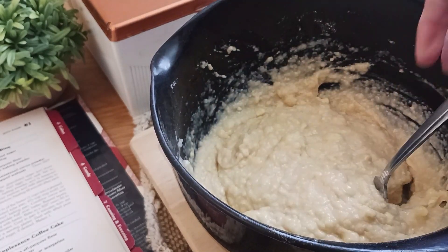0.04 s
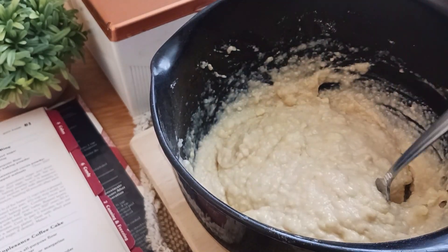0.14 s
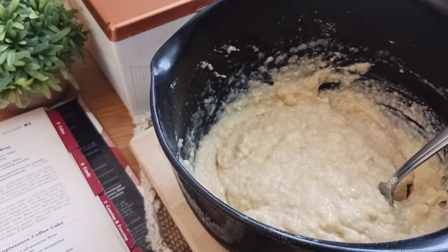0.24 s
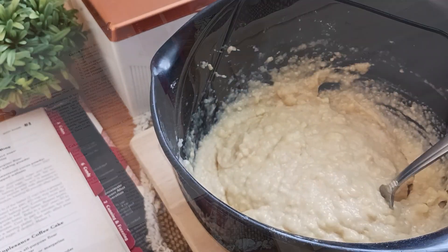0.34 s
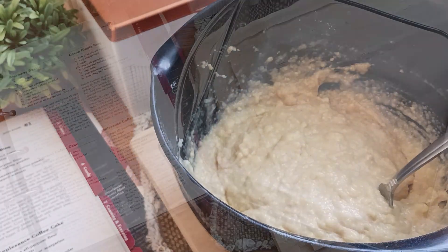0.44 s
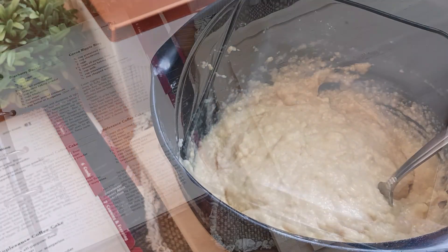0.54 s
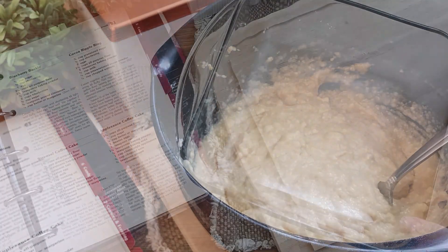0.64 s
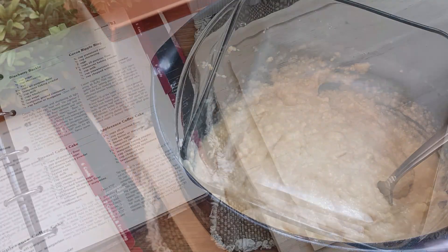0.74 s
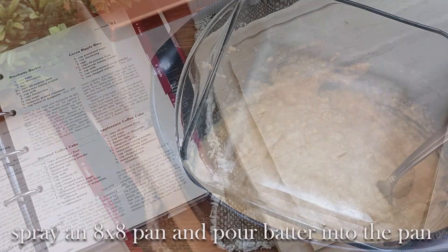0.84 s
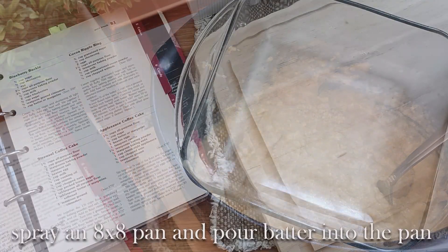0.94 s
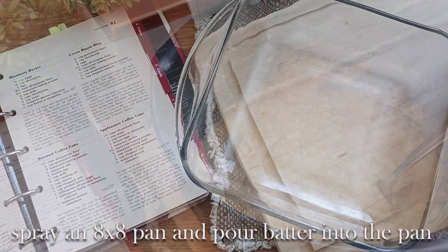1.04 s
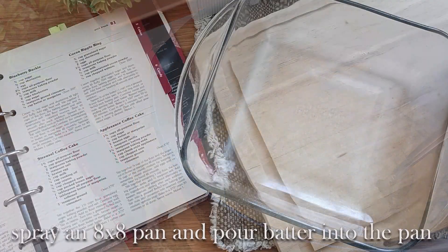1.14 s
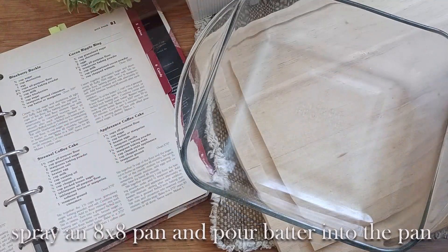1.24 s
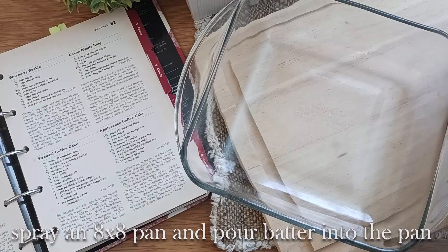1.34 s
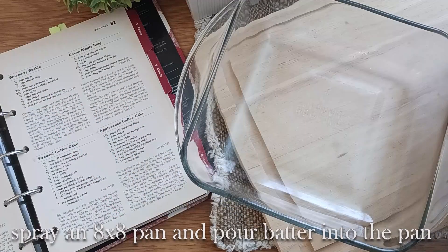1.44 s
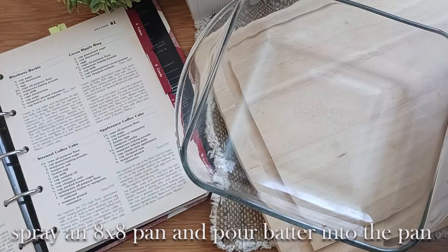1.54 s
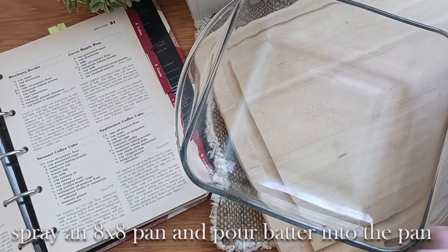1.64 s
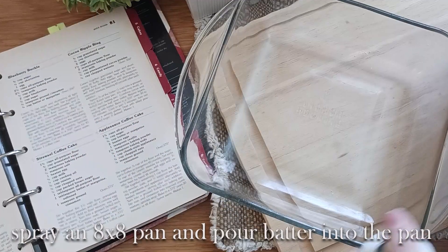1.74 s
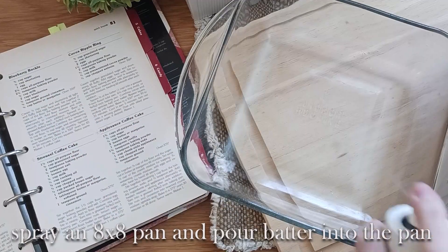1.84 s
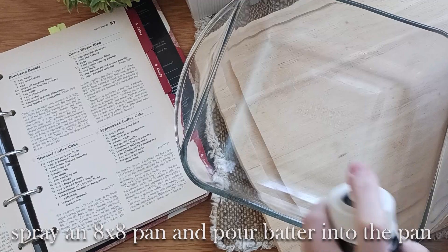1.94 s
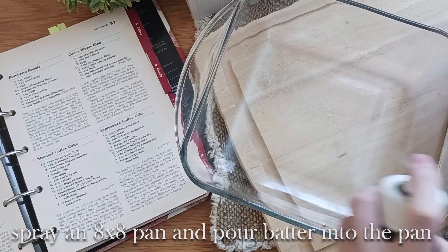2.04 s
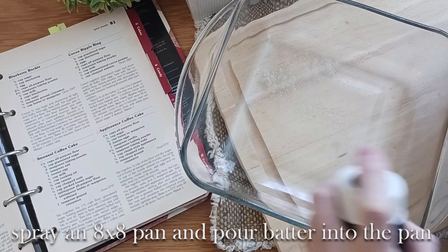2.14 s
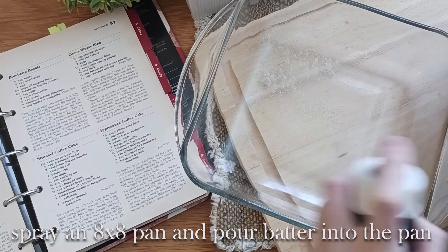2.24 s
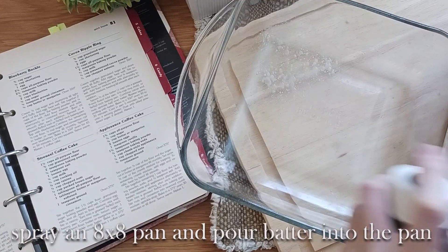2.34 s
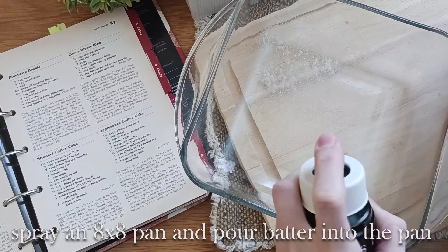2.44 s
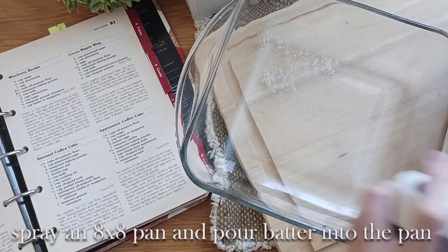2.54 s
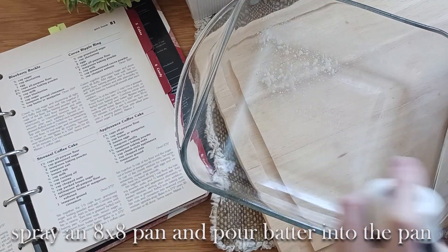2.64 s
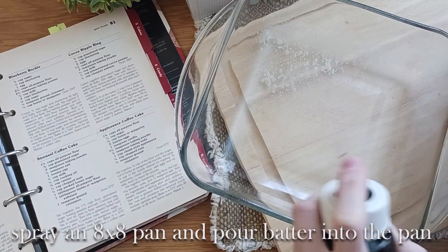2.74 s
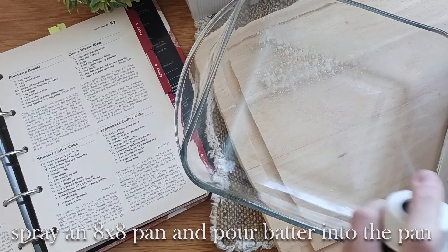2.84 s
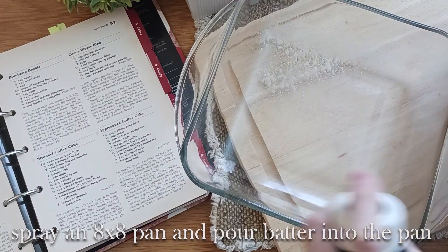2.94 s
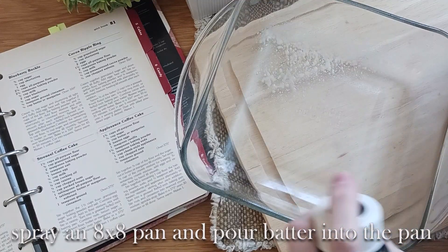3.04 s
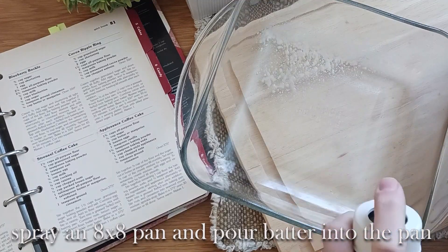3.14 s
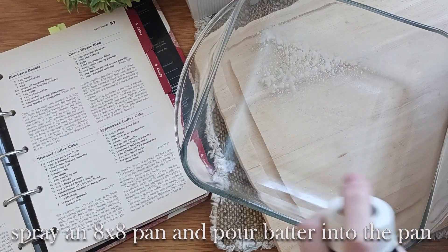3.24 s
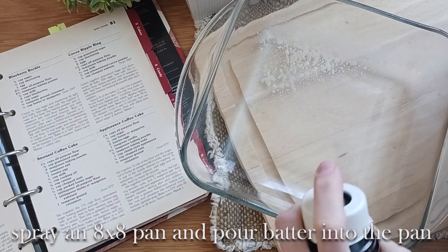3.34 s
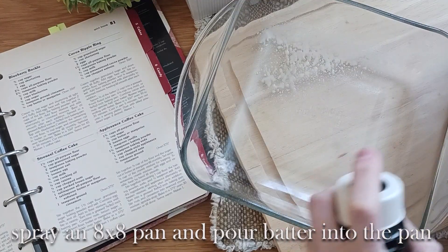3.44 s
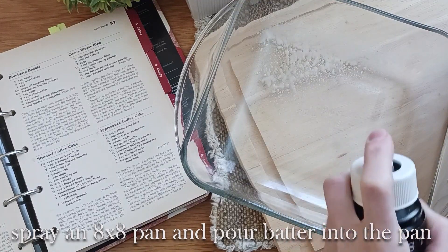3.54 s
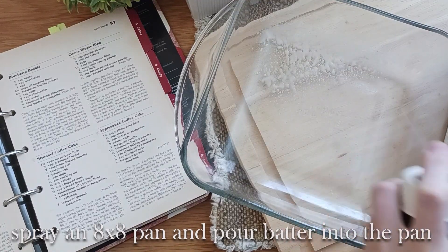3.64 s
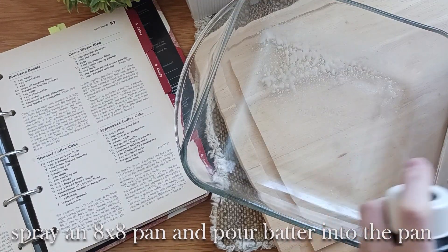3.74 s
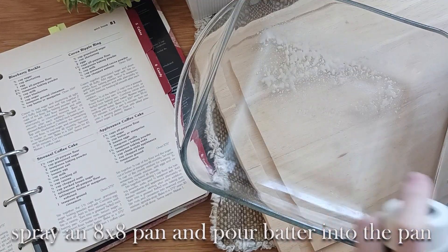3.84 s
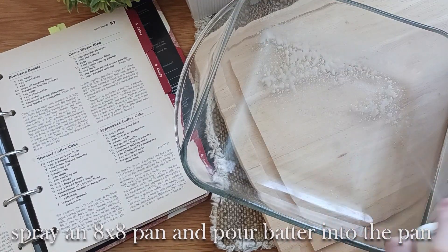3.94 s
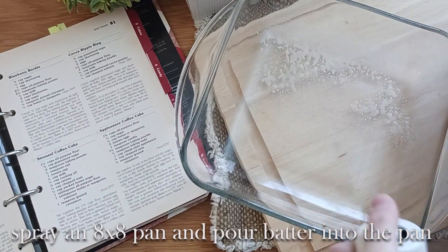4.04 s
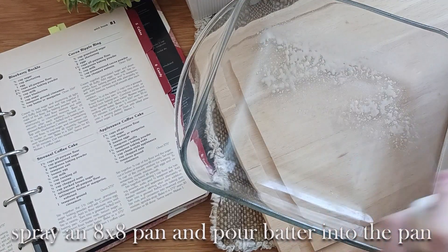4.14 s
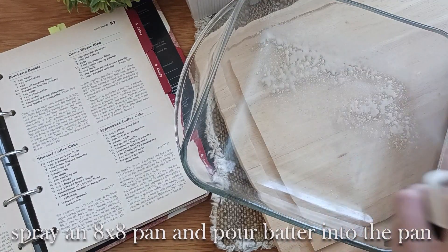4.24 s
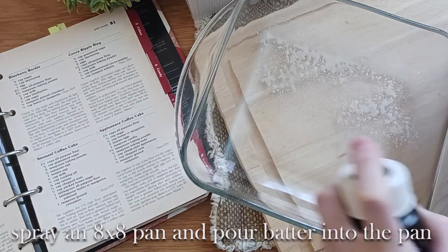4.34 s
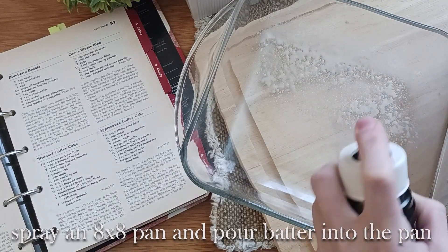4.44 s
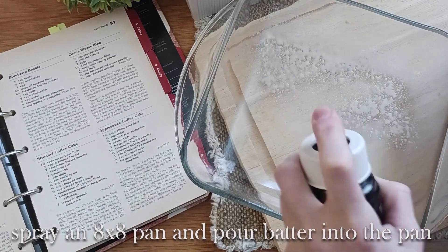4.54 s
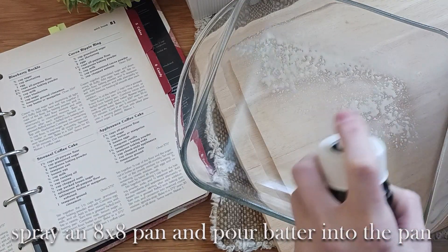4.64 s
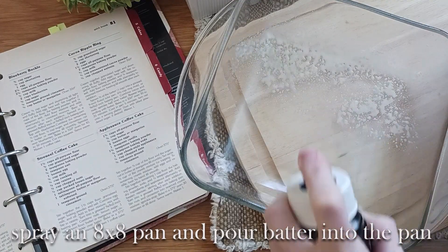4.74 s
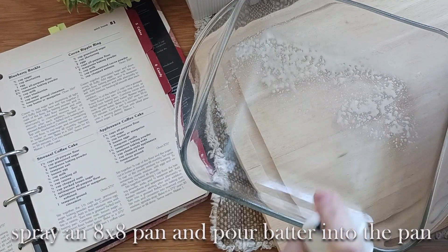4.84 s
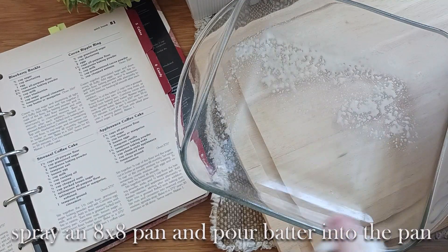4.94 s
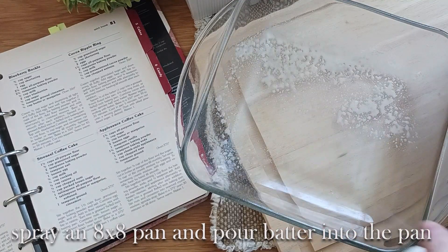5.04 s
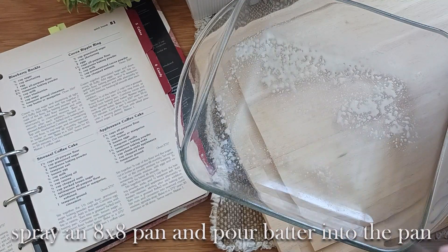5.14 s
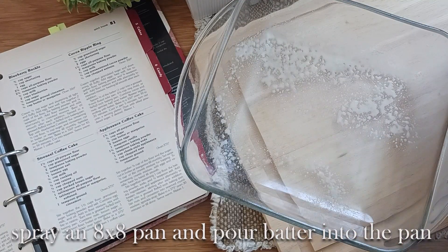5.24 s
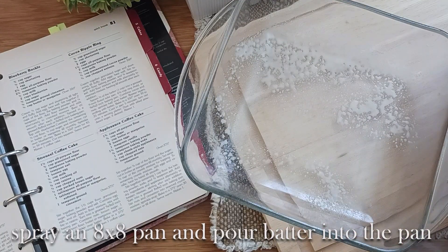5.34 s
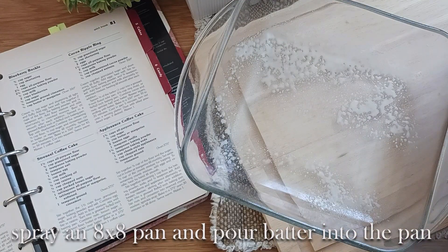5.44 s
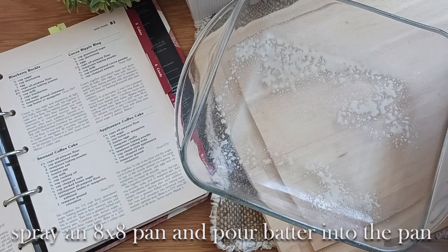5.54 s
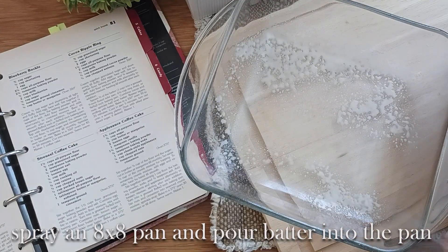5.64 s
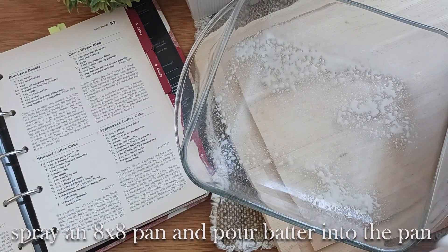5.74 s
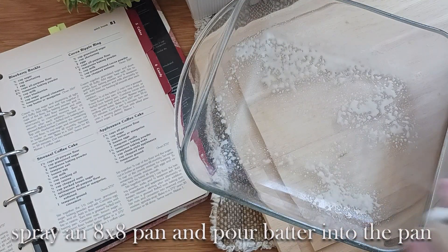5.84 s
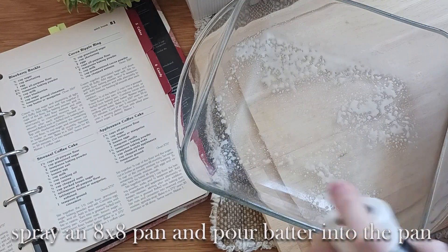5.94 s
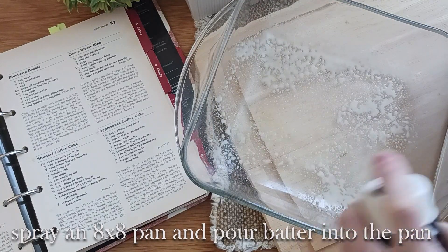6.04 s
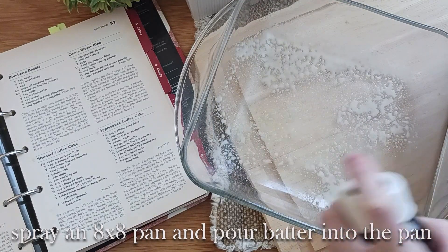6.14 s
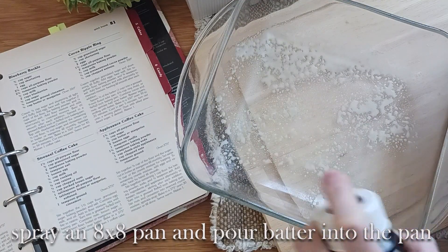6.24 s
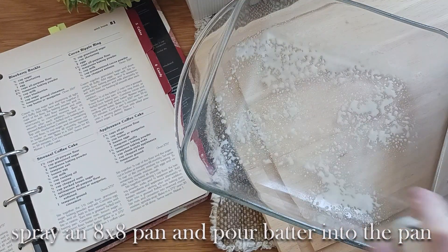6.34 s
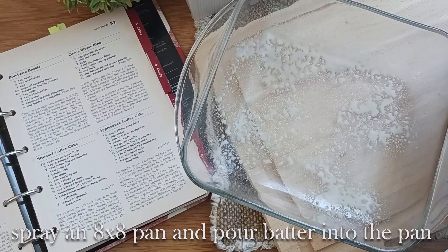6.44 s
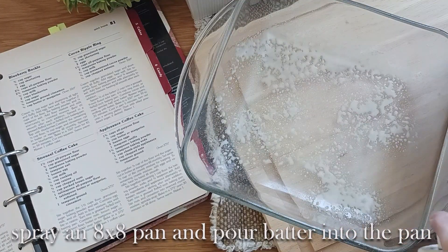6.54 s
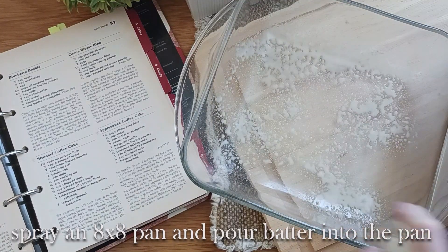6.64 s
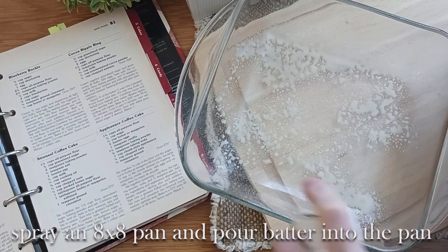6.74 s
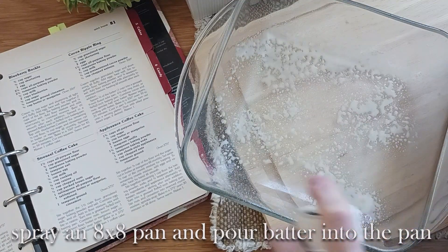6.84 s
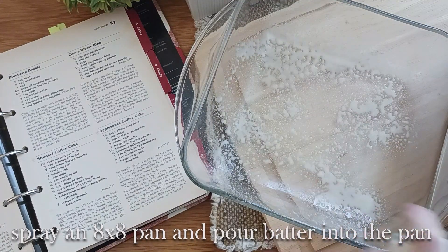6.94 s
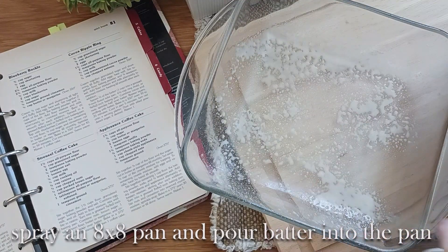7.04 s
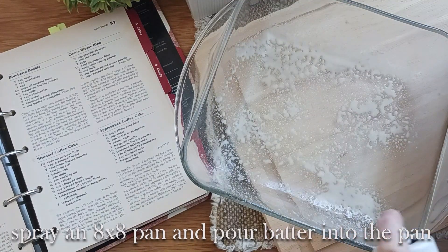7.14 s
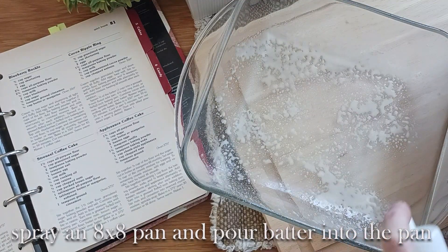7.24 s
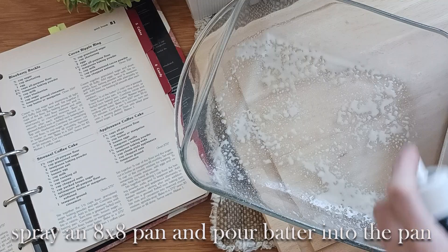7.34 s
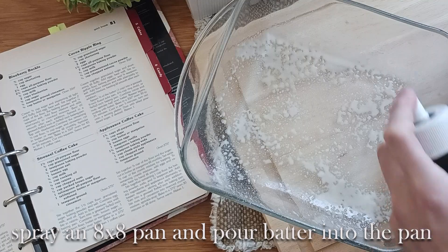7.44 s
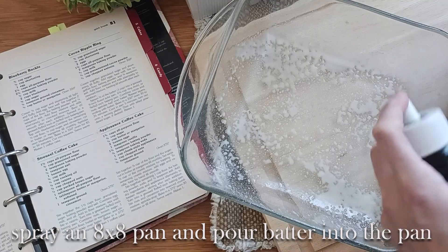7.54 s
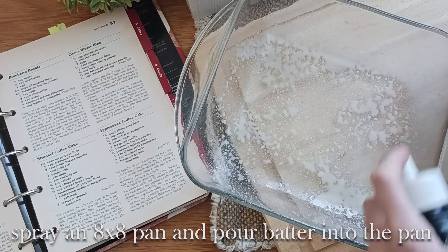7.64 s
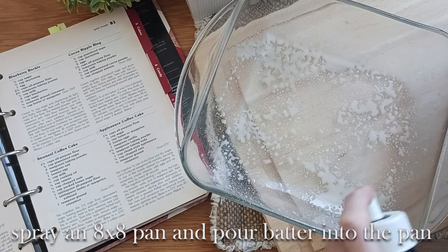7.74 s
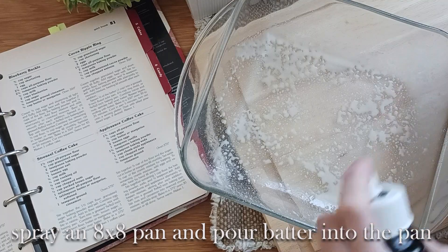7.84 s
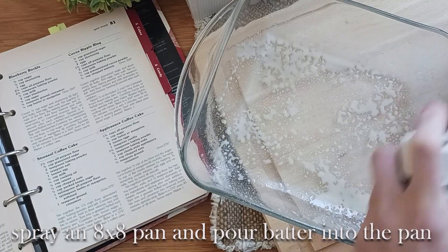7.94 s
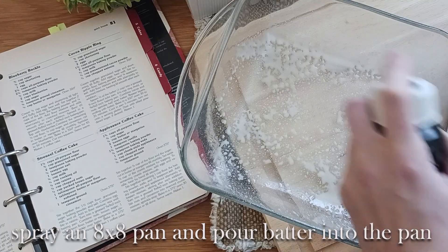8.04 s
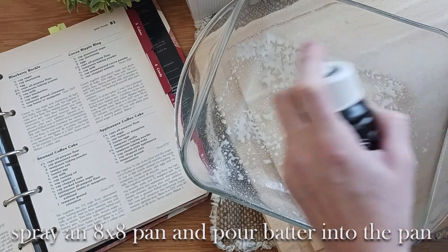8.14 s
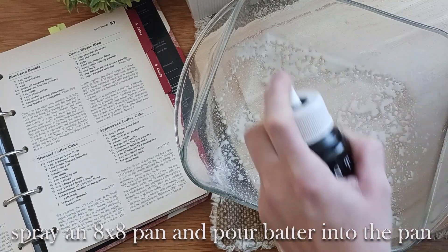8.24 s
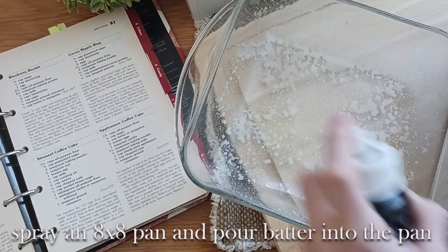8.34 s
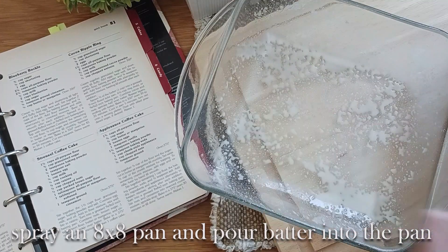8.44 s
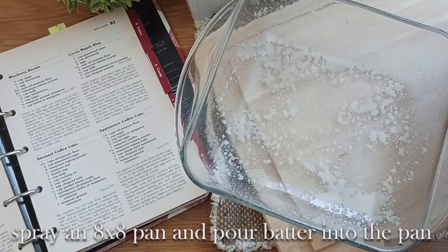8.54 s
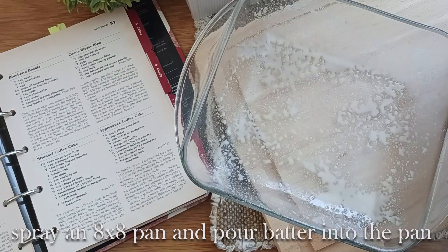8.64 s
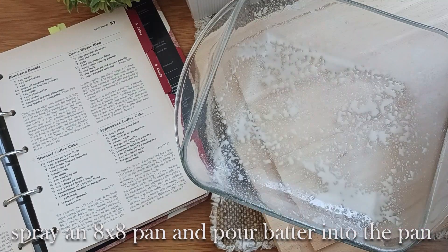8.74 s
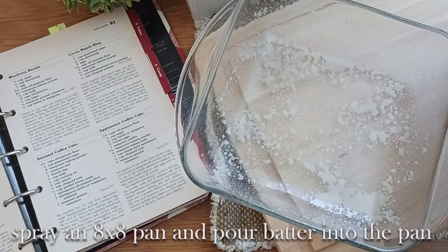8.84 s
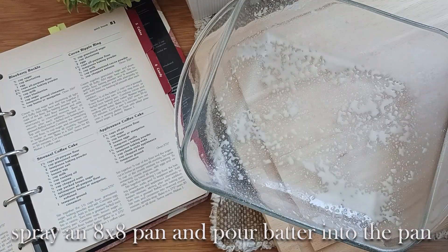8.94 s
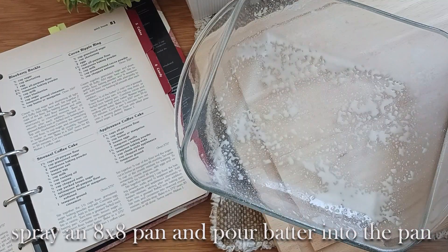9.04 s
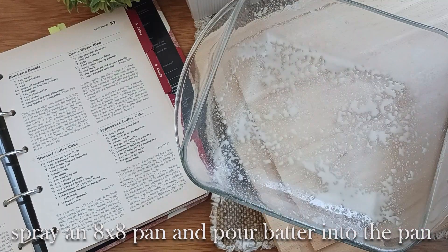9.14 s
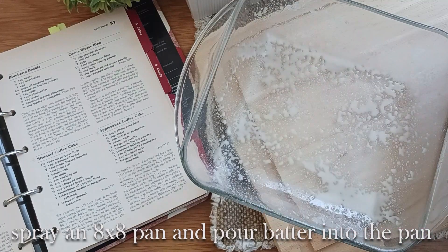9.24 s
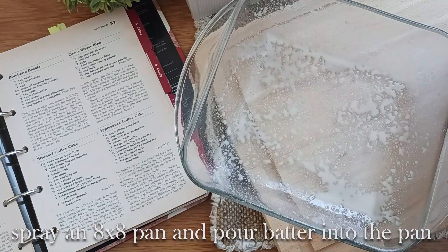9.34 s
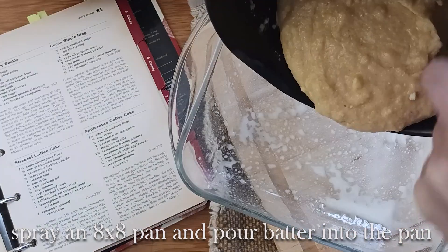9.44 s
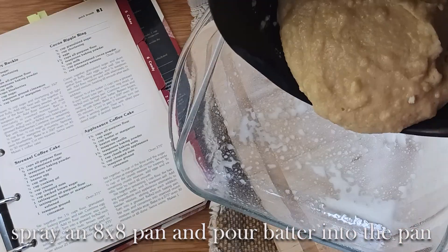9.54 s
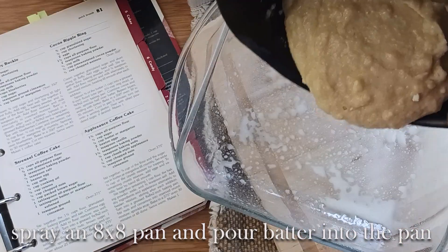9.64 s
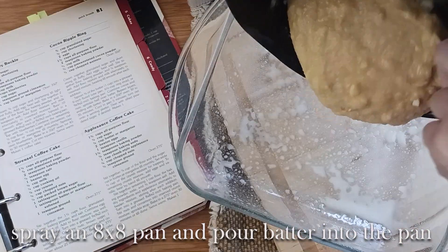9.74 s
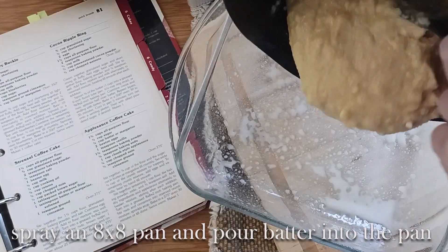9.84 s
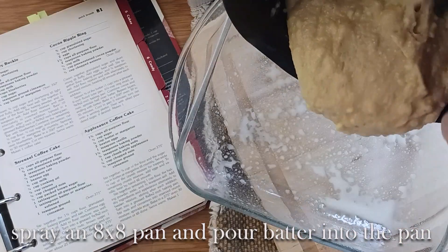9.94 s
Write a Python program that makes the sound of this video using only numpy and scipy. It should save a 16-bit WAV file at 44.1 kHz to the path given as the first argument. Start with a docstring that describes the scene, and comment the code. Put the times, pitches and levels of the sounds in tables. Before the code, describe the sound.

A sharp pop of a can's cap is followed by the close, high hiss of aerosol oil hitting a glass baking dish: one squirt, a long one, then three short ones with nozzle clicks. Quiet plastic taps follow on the left as the can is set down, then a faint sticky rustle of batter leaving a bowl. The small kitchen has a short echo, a soft appliance hum and very faint birdsong from outside.

```python
"""Aerosol oil, five squirts onto a glass baking dish, close to a two-port microphone in a small kitchen.
Gas fizzes in the nozzle and droplets hiss lower on the glass. First the can's cap pops off; afterwards
can and cap tap down on the counter to the left, and batter tips from a bowl with a rustle and ticks.
An appliance hums through the room's low resonances, and a bird whistles faintly outside."""
import sys
import numpy as np
from scipy import signal
from scipy.fft import rfft, irfft
from scipy.io import wavfile
from scipy.ndimage import uniform_filter1d

SR = 44100
rng = np.random.default_rng(int(sys.argv[2]) if len(sys.argv) > 2 else 0)


def waveform_to_disk(signal):
    """Save audio, clipped to [-1, 1], as 16-bit WAV at the path in sys.argv[1]."""
    frames = np.transpose(np.atleast_2d(signal))
    scaled = np.clip(frames, -1, 1) * 32767
    samples = np.round(scaled).astype(np.int16)
    wavfile.write(sys.argv[1], SR, samples)


N = 440548

# low room resonances: f/Hz, width/Hz, level/dB
HUM_MODES = [(63.6, 17, -18.5), (130.3, 3.9, -5.5), (225, 19, -13.5), (260.8, 7.2, 3.5), (293, 4.5, -24),
             (369.7, 4, -8.5), (402, 12, -25.5)]
# appliance hum over time: t/s, level/dB
HUM_LEVEL = [(0.0, -53.5), (2.9, -52.5), (3.25, -63.5), (3.7, -54), (6.4, -52), (6.55, -58), (7.3, -49),
             (7.9, -57), (9.15, -59), (9.6, -49.5), (9.99, -59)]
# air hiss spectrum: f/Hz, relative level/dB
AIR_SPECTRUM = [(15, -73), (25, -19), (126, -22.5), (174, -15), (261, -11.5), (307, -11), (586, -24),
                (670, -23), (1820, -29), (2140, -34.5), (15700, -42)]
# handle on the bowl: t/s, level/dB, resonances (f/Hz, width/Hz, level/dB)
SPOON_KNOCK = (0.253, -43, [(380, 400, 8), (736, 400, -2)])
# bird outside: t/s, length/s, first f/Hz, settled f/Hz, level/dB
BIRD_NOTES = [(.35, .06, 6300, 6300, -78), (.745, .12, 3150, 3080, -77), (0.872, 0.065, 5900, 5780, -70),
              (1.404, 0.043, 6000, 5880, -65), (1.442, 0.22, 5350, 3900, -71.5),
              (8.486, .22, 2290, 3130, -72.5), (9.52, .08, 5000, 5900, -75),
              (9.77, 0.22, 2620, 2680, -72.5)]
# hands and batter: t/s, hold/s, level/dB, t60/s
RUSTLES = [(.78, 0.067, -68.5, .1), (1.44, 0.051, -65, .1), (9.592, 0.027, -57, 0.92)]
# the cap's pop and rattles: t/s, level/dB
CAP_HITS = [(1.1805, -15.5), (1.1898, -19), (1.195, -27), (1.2, -37)]
# resonances of cap and can: f/Hz, width/Hz, level/dB
CAN_MODES = [(500, 100, -6.5), (980, 150, 2.5), (1230, 300, 6.5), (1380, 110, -10), (1840, 150, -11),
             (2440, 710, -8), (4400, 590, -9.5), (5460, 680, -19), (7300, 730, -13.5), (10830, 4200, -18),
             (13500, 5400, -18)]
# squirts: press t/s, release t/s, early fizz level/dB, late fizz level/dB, droplets re fizz/dB
PRESSES = [(1.839, 2.999, -30.5, -35, -5), (3.467, 6.47, -34.5, -35, -5), (6.568, 7.074, -36, -35.5, -4),
           (7.17, 7.726, -33.5, -36, -5.5), (7.919, 8.229, -36.5, -34, -5.5)]
# spray spectrum: f/Hz, relative level/dB
SPRAY_SPECTRUM = [(400, -21), (600, -21), (900, -16.5), (1400, -14), (2200, -10), (3200, -4), (3950, -6),
                  (5000, -3), (6200, -6.5), (7500, -0.5), (8700, -5.5), (10400, -9), (11500, -4),
                  (13800, -3), (15700, -7)]
# narrow peaks and dips in the spray's hiss: f/Hz, width/Hz, lift or dip/dB
SPRAY_PEAKS_DIPS = [(967, 28, 2), (1150, 165, 7.5), (1900, 120, 3), (3540, 200, 3.5), (3850, 200, -3),
                    (12600, 760, 2), (13650, 500, -2.5), (15500, 1500, 6)]
# the right port's lag as the can sweeps across the dish: t/s, delay/ms
SWEEP_LAG = [(1.9, .24), (2.5, .21), (3.5, .25), (4.1, .27), (4.55, .18), (4.9, .18), (5.1, .27), (5.6, .3),
             (6.1, .23), (6.7, .18), (7.3, .25), (8.1, .17)]
# valve jolts: t/s, level/dB
VALVE_JOLTS = [(1.8388, -13), (3.468, -30), (7.1775, -24), (7.092, -24), (7.7228, -18), (7.7334, -27),
               (7.7485, -14), (7.757, -22), (7.9204, -27), (8.244, -26)]
# plastic on the counter: t/s, level/dB, body re level/dB, snap re level/dB
COUNTER_TAPS = [(8.696, -53, -9, -13), (8.7043, -50, 5, -8), (8.7831, -44, -5.5, -7),
                (8.8784, -52, -12, -9), (8.955, -58, -15, -5), (8.9645, -51, -9, -7), (9.2767, -57, 1, -13),
                (9.3072, -53.5, -1, -16), (9.374, -42, -21, -5), (9.3819, -40.5, -8, -1),
                (9.3958, -46, 1, 5)]
# resonances of the thin plastic: f/Hz, width/Hz, level/dB
PLASTIC_MODES = [(3270, 300, 5), (3540, 970, 12)]
# resonances of its lower body: f/Hz, width/Hz, level/dB
BODY_MODES = [(604, 350, -1), (1180, 360, 11), (1920, 2200, 2.5)]
# sticky batter: t/s, level/dB, f/Hz
BATTER_TICKS = [(9.761, -49, 8260), (9.7921, -49, 12800), (9.875, -55, 7860), (9.8909, -49, 12100),
                (9.96, -51, 5570)]
# kitchen decay: f/Hz, t60/s
KITCHEN_DECAY = [(300, 0.21), (1200, 0.54), (2500, 0.47), (4500, 0.55), (12000, 0.17)]
# likeness of the two ports for room sounds: f/Hz, coherence
ROOM_COHERENCE = [(60, 0.73), (130, 0.95), (290, 0.83), (640, 0.28), (1300, 0.056), (5000, 0.075)]
# likeness of the two ports for the near jet: f/Hz, coherence
JET_COHERENCE = [(640, .6), (1300, .52), (3000, .38), (6000, .34), (12000, .24)]
# microphone balance for noise: f/Hz, left minus right/dB
PORT_BALANCE = [(50, 6), (110, -2), (250, 3), (1200, 3.5), (2400, 4), (4500, 4), (6500, 3.5), (7600, 2),
                (8800, 5.5), (15000, 5.5)]


def gain_of(db):
    return 10 ** (np.asarray(db) / 20)


def unit_rms(x):
    return x / np.sqrt(np.mean(x ** 2) + 1e-20)


def curve_at(points, hz):
    f, value = np.transpose(points)
    return np.interp(np.log(hz + 1), np.log(f + 1), value)


def add(mix, s, sound):
    part = mix[..., round(s * SR):][..., :sound.shape[-1]]
    part += sound[..., :part.shape[-1]]


def bell(hz, centre_hz, width_hz):
    return 1 / (1 + (2 * (hz - centre_hz) / width_hz) ** 2)


def drift(first, second):
    """Unit noise smoothed over two spans, in samples."""
    return unit_rms(uniform_filter1d(uniform_filter1d(rng.standard_normal(N), first), second))


def flicker(db):
    """Quick level flutter shared by all frequencies."""
    return gain_of(db * drift(250, 120))


def sides(pan_db):
    """Port gains; positive leans left."""
    return gain_of(np.array([.5, -.5])[:, None] * pan_db)


def from_counter(x, pan_db, delay_s=5.2e-4):
    """The counter lies to the left, so that port hears it louder and earlier."""
    return np.array([x, np.roll(x, round(delay_s * SR))]) * sides(pan_db)


def port_noise(colour_db, size, patchy_db, ripple_db, near=False):
    """Coloured unit noise at both ports, with drifting patches and a fine ripple from reflections."""
    hop = size // 4
    frames, hz = N // hop + 5, np.fft.rfftfreq(size, 1 / SR)
    a, b, c, d, chance = rng.standard_normal((frames, len(hz), 5)).T
    left, unrelated = a + 1j * b, c + 1j * d
    patches = unit_rms(uniform_filter1d(uniform_filter1d(chance, size // 40, axis=0), 4, axis=1))
    ripple = unit_rms(uniform_filter1d(uniform_filter1d(chance[::-1], 2, axis=0), 14, axis=1))
    coherence = curve_at(JET_COHERENCE if near else ROOM_COHERENCE, hz)[:, None]
    lag_s = np.interp(np.arange(frames) * hop / SR, *np.transpose(SWEEP_LAG)) / 1000 if near else 0
    delayed = left * np.exp(-2j * np.pi * hz[:, None] * lag_s)
    right = coherence * delayed + np.sqrt(1 - coherence ** 2) * unrelated
    level = gain_of(colour_db(hz)[..., None] + patchy_db * patches + ripple_db * ripple)
    spectra = np.array([left, right]) * level * sides(curve_at(PORT_BALANCE, hz))[..., None]
    return unit_rms(signal.istft(spectra, nperseg=size, noverlap=size - hop)[1][:, :N])


def ring(modes, t60, grit):
    """A sharp contact with a gritty tail, through broad, steep-sided resonances; peak 1."""
    t, hz = np.arange(4096) / SR, np.fft.rfftfreq(8192, 1 / SR)
    blow = grit * rng.standard_normal(len(t)) * gain_of(-60 * t / t60)
    blow[0] = 1
    body = sum(gain_of(db) / (1 + 2j * (hz - f) / width) ** 2 for f, width, db in modes)
    out = irfft(rfft(blow, 8192) * body)[:len(t)]
    return out / abs(out).max()


def snap(low_hz, high_hz, t60):
    """A short burst of band noise; peak 1."""
    burst = rng.standard_normal(3000) * gain_of(-60 * np.arange(3000) / SR / t60)
    band = signal.butter(2, [low_hz, high_hz], "band", fs=SR, output="sos")
    burst = signal.sosfilt(band, burst)
    return burst / abs(burst).max()


def room_tone():
    """An appliance hums in narrow room resonances; faint air hiss follows about half of its dB swing."""
    def hum_colour(hz):
        return 20 * np.log10(sum(gain_of(db) * bell(hz, f, width) for f, width, db in HUM_MODES))
    hum = port_noise(hum_colour, size=8192, patchy_db=.5, ripple_db=1.5)
    air = port_noise(lambda hz: curve_at(AIR_SPECTRUM, hz), size=1024, patchy_db=1.6, ripple_db=2.5)
    hum_db = np.interp(np.arange(N) / SR, *np.transpose(HUM_LEVEL))
    air_db = -61 + .47 * (hum_db + 54)  # the hum usually sits at -54 dB
    return gain_of(hum_db) * hum + gain_of(air_db) * flicker(.42) * air


def spoon():
    """A handle settles on the bowl: a soft low knock, straight ahead of the microphone."""
    s, db, modes = SPOON_KNOCK
    out = np.zeros(N)
    add(out, s, gain_of(db) * ring(modes, t60=.04, grit=.25))
    return out


def bird(glide_s=.024, rise_s=.02, fade_db=-20):
    """Gliding whistles from outside, made breathy by a quick wander of level and phase."""
    flutter = .9 + .6 * (drift(200, 200) + 1j * drift(200, 200))
    notes = np.zeros(N, complex)
    for s, length, first_hz, settled_hz, db in BIRD_NOTES:
        t = np.arange(0, length, 1 / SR)
        hz = settled_hz + (first_hz - settled_hz) * np.exp(-t / glide_s)
        level = np.minimum(t / rise_s, 1) ** 2 * gain_of(db + fade_db * (t / length) ** 2)
        add(notes, s, level * np.exp(2j * np.pi * np.cumsum(hz) / SR))
    return (flutter * notes).real


def rustle():
    """Hands and batter: broad noise, thin in the bass, that swells, holds and fades with each stroke."""
    t = np.arange(N) / SR
    strokes = sum((t >= s) * gain_of(db - 60 * np.maximum(t - s - hold, 0) / t60)
                  for s, hold, db, t60 in RUSTLES)
    level = uniform_filter1d(strokes, 400) * flicker(1.2)
    return level * port_noise(lambda hz: -24 * bell(hz, 0, 1400), size=256, patchy_db=1.5, ripple_db=2)


def cap(notch_hz=3520, notch_width_hz=870):
    """The cap cracks off and rattles through the can's resonances, with a notch near 3.5 kHz."""
    out = np.zeros(N)
    for s, db in CAP_HITS:
        add(out, s, gain_of(db) * ring(CAN_MODES, t60=.011, grit=.45))
    return signal.lfilter(*signal.iirnotch(notch_hz, notch_hz / notch_width_hz, SR), out)


def valve():
    """The valve jolts as the button opens or stutters: bright snaps, mostly at the left port."""
    out = np.zeros((2, N))
    for s, db in VALVE_JOLTS:
        left, right = snap(12300, 20000, t60=.05), .25 * snap(12000, 12400, t60=.019)
        add(out, s, gain_of(db) * np.array([left, right]))
    return out


def jet_level(level_db, sputter, bleed_t60, room_t60, wet_db):
    """The jet opens at once, bleeds off as the valve shuts, and its power lingers in the room."""
    fall_db = 60 / bleed_t60 * np.arange(N) / SR
    level = sputter * gain_of(np.maximum.accumulate(level_db + fall_db) - fall_db)
    level *= gain_of(.55 * drift(4000, 2000))  # unsteady finger and aim
    keep = gain_of(-120 / room_t60 / SR)
    room_power = signal.lfilter([1 - keep], [1, -keep], level ** 2)
    return np.sqrt(level ** 2 + gain_of(2 * wet_db) * room_power)


def spray(split_hz=9000):
    """Close up, gas tearing through the nozzle fizzes high; droplets striking the glass hiss lower."""
    def colour(hz, high):
        peaks_dips_db = sum(db * bell(hz, f, width) for f, width, db in SPRAY_PEAKS_DIPS)
        share = 1 / (1 + (split_hz / (hz + 1)) ** 16)
        return curve_at(SPRAY_SPECTRUM, hz) + peaks_dips_db + 10 * np.log10(share if high else 1 - share)
    fizz = port_noise(lambda hz: colour(hz, True), size=2048, patchy_db=.7, ripple_db=3, near=True)
    drops = port_noise(lambda hz: colour(hz, False), size=2048, patchy_db=.7, ripple_db=3.3, near=True)
    fizz_db, drops_db = np.full((2, N), -200.)
    for press, release, early_db, late_db, landing_db in PRESSES:
        held = slice(round(press * SR), round(release * SR))
        t = np.arange(held.stop - held.start) / SR
        build_db = -2.5 * np.exp(-t / .15)  # the flow starts weaker
        wetting_db = -10.5 * np.exp(-t / .017)  # gas comes first, oil follows
        drying_db = -4 * np.exp(-t[::-1] / .032)  # droplets thin out as the finger lifts
        fizz_db[held] = early_db + (late_db - early_db) * t / t[-1] + build_db
        drops_db[held] = fizz_db[held] + landing_db + wetting_db + drying_db
    sputter = flicker(.8)
    fizz *= jet_level(fizz_db, sputter, bleed_t60=.14, room_t60=.24, wet_db=-6)
    drops *= jet_level(drops_db, sputter, bleed_t60=.24, room_t60=.43, wet_db=-9.5)
    return fizz + drops


def taps():
    """Can and cap meet the counter: each tap rings thin plastic and its body, with a bright snap."""
    out = np.zeros(N)
    for s, db, body_db, snap_db in COUNTER_TAPS:
        add(out, s, gain_of(db) * ring(PLASTIC_MODES, t60=.027, grit=.094))
        add(out, s, gain_of(db + body_db) * ring(BODY_MODES, t60=.031, grit=.14))
        add(out, s, gain_of(db + snap_db) * snap(4700, 14000, t60=.011))
    return out


def batter():
    """Sticky batter ticks as it pulls off the bowl."""
    out = np.zeros(N)
    for s, db, hz in BATTER_TICKS:
        add(out, s, gain_of(db) * snap(.67 * hz, 1.33 * hz, t60=.0088))
    return out


def kitchen(x):
    """The small room: sparse reflections of random sign, each band dying at its own speed."""
    echoes = np.zeros((2, SR // 2))
    arrivals = np.arange(150, SR // 2 - 20, 20) + rng.integers(0, 20, (2, (SR // 2 - 151) // 20))
    np.put_along_axis(echoes, arrivals, rng.choice([-1., 1.], arrivals.shape), 1)
    hz, t, spectra = signal.stft(echoes, SR, nperseg=256)
    decay = gain_of(-60 * t / curve_at(KITCHEN_DECAY, hz)[:, None])
    tail = signal.istft(spectra * decay, SR, nperseg=256)[1]
    return signal.fftconvolve(x, tail / np.linalg.norm(tail[0]), axes=1)[:, :N]


def scene():
    """The kitchen from beside the dish."""
    pop = from_counter(cap(), pan_db=3.3)
    handling = from_counter(taps() + batter(), pan_db=12.3) + spoon()
    song = bird() * sides(1.2)
    reverb = kitchen(gain_of(-6.5) * pop + gain_of(-8) * handling + gain_of(-5) * song)
    return spray() + valve() + pop + handling + reverb + rustle() + song + room_tone()


def record(dry, edge_hz=15745):
    """The recorder's steep band limit."""
    lowpass = signal.firwin(2047, edge_hz, window=("kaiser", 9), fs=SR)
    return signal.oaconvolve(dry, lowpass[None], "same")


dry = scene()
out = record(dry)
waveform_to_disk(out)
```